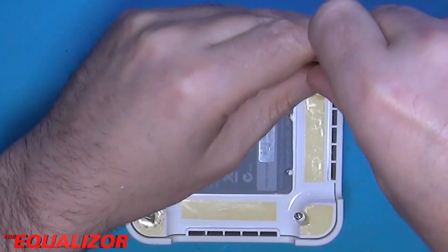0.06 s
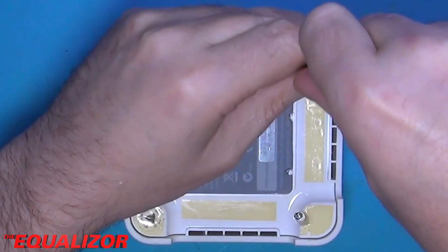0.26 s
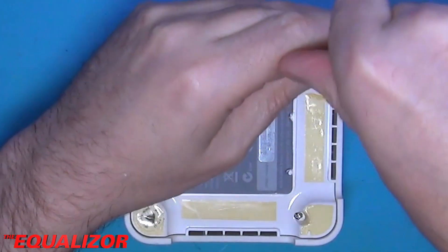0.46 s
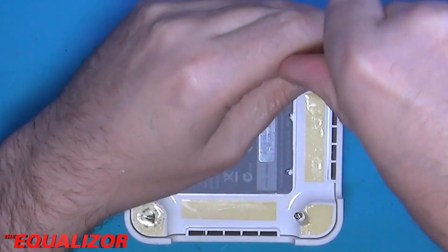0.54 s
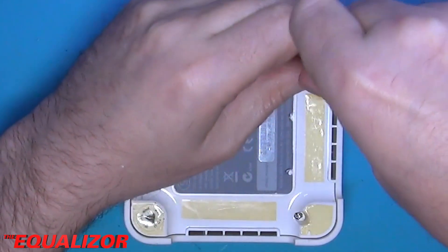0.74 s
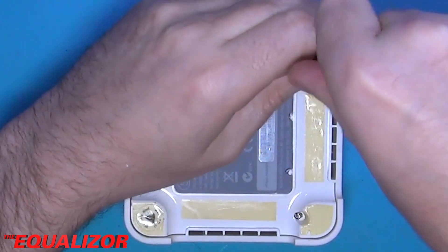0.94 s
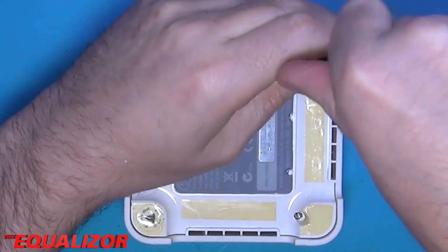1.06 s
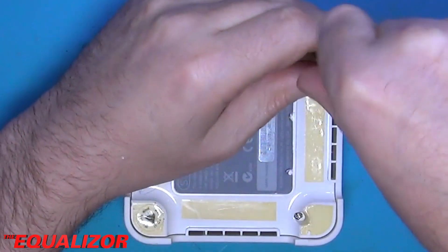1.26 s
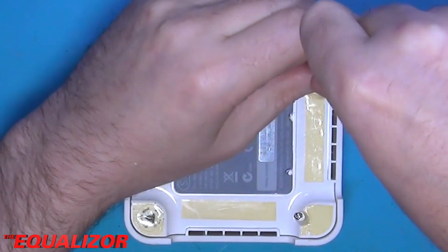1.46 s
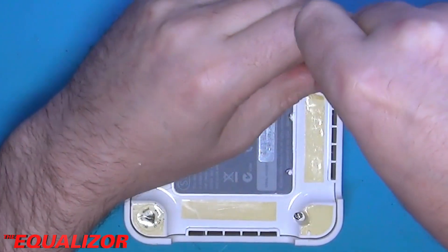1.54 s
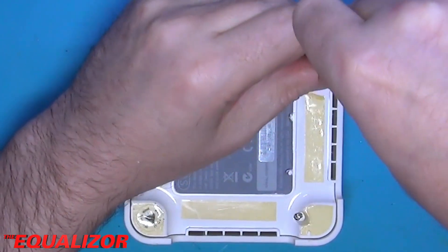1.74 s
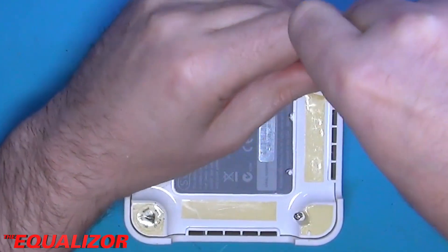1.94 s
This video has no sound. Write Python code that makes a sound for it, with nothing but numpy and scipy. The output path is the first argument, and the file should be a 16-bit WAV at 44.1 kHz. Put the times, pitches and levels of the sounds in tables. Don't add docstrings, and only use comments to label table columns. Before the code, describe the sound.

Close-up of a screwdriver bit slipping in a plastic shell, a hard crack early on, tiny handling knocks, another crisp cluster of clicks late, then soft gritty creeping, with a short indoor room tail.

```python
import sys
import numpy as np
from scipy import signal
from scipy.fft import rfft, irfft, next_fast_len
from scipy.io import wavfile

SR = 44100
rng = np.random.default_rng(int(sys.argv[2]) if len(sys.argv) > 2 else 0)


def magnitude_from_level(level_db):
    exponent = np.asarray(level_db, float) / 20
    return 10 ** exponent


def generate_wav(sig):
    pcm = np.round(np.clip(np.atleast_2d(sig).T, -1, 1) * 32767).astype(np.int16)
    wavfile.write(sys.argv[1], SR, pcm)


N = 88200

# (frequency [Hz], level per Hz [dB])
AIR_SPECTRUM = [(25, -31), (120, -9), (400, -6), (1100, -8), (2400, -13), (3300, -19), (4800, -14),
                (11000, -25), (12400, -50)]
AIR_DB = -67.5
HUM_HZ, HUM_DB = 200, -78

# (time [s], shell level [dB], hollow over shell [dB], steel over shell [dB], skid length [s])
SLIPS = [(.135, -45, -12, -12, .007), (.165, -47, -6, -14, .006), (.184, -50, -6, -12, .008),
         (.2122, -4.5, -7, -12, .0004), (.3291, -24, -4, -23, .0006), (.3845, -50, 2, -25, .008),
         (.906, -54, -12, -12, .006), (.4352, -39, 1, -25, .004), (.442, -46, 3, -25, .003),
         (1.432, -47, -6, -8, .01), (1.44, -32, -4, -14, .008), (1.451, -37, -8, -15, .009),
         (1.7044, -21, -6, -4, .002), (1.7088, -15, -6, 0, .0015), (1.7098, -20, 11, -5, .0015),
         (1.848, -54, -4, -16, .008), (1.8695, -51, -3, -3, .004), (1.877, -50, 8, -15, .01),
         (1.8855, -46, 13, -15, .003), (1.8995, -52, -8, 5, .02)]
# (frequency [Hz], level [dB], t60 [s])
SHELL = [(1050, -9, .02), (1260, -8, .028), (1600, 0, .034), (1865, -3, .025), (2075, -10, .025),
         (2380, -22, .02)]
# (frequency [Hz], level [dB], t60 [s])
HOLLOW = [(200, -24, .03), (370, -28, .04), (440, -19, .1), (525, -6, .035), (655, 0, .03), (870, -1, .025)]
# (frequency [Hz], level [dB], t60 [s])
STEEL = [(3120, -22, .014), (3850, -13, .012), (4100, -2, .012), (4650, 1, .012), (5000, -1, .014),
         (5400, -4, .012), (6000, 1, .012), (6500, -3, .012), (7300, -8, .01), (9400, -14, .008),
         (10500, -17, .008)]
# (frequency [Hz], level [dB])
CRACK = [(150, -35), (1500, -10), (3000, -14), (4200, -3), (6500, -1), (9000, -7), (11000, -14),
         (12000, -40)]
CRACK_DB, CRACK_T60_S = -6, .012
# (frequency [Hz], level [dB])
RADIATION = [(20, -22), (60, -8), (130, -4), (350, 1), (500, 5)]
CASING_DB = -3.5
FIRST_CATCH, SUDDEN_S = 6, .003

BLOW_SAMPLES = SR // 8
SCATTER_DB, DETUNE = 2, .006
LONGEST_S = .1
DULL_DB = .045
SOFT_DAMP, SOFT_ROOM = .12, .12

# (frequency [Hz], t60 [s])
ROOM_DECAY = [(100, .24), (450, .28), (1600, .2), (5000, .19), (11000, .13)]
# (frequency [Hz], level [dB])
ROOM_COLOUR = [(200, -5), (450, 3), (900, 4), (1600, -4), (3000, -3), (5500, 0), (8000, 1), (11000, 0)]
ROOM_DB, ROOM_DELAY_S = -10, .005
SPREAD_S = .0035
SNAP_DB = 6

# (time [s], peak level [dB])
NUDGES = [(.9135, -49), (.981, -53), (.991, -52), (1.372, -48), (1.379, -53), (.436, -43), (1.441, -40)]
# (frequency [Hz], level [dB], t60 [s])
HANDLE = [(530, -8, .025), (850, -6, .02), (1050, 0, .03), (1200, -6, .02), (1600, -4, .035)]

# (time [s], peak level [dB])
TICKS = [(1.1154, -53), (1.1244, -56), (1.1665, -54), (1.372, -56), (1.8442, -52), (1.8552, -50),
         (1.8644, -54), (1.8774, -52), (1.8886, -47), (1.9126, -46), (1.9294, -52), (1.9404, -56),
         (1.9455, -51), (1.9594, -51), (1.9749, -48), (1.9944, -55)]
TICK_DB, TICK_T60_S = 2, .04

# (time [s], pressure level [dB])
DRAG = [
    (1.83, -85),
    (1.85, -69),
    (1.9, -63),
    (1.925, -68),
    (2, -68),
]
# (frequency [Hz], level [dB])
GRIND = [(500, -22), (1600, -10), (2300, -5), (3300, -16), (4600, 0), (5800, -4), (8000, -14), (11000, -30)]

# (frequency [Hz], level [dB])
MIC = [(20, 0), (11800, 0), (12450, -40)]


def unit(x):
    return x / np.sqrt(np.mean(x ** 2) + 1e-20)


def peak(x):
    return x / np.abs(x).max()


def along(points, hz):
    f, v = np.transpose(points)
    return np.interp(np.log(hz + 1), np.log(f + 1), v)


def coloured(x, points):
    m = next_fast_len(len(x) + 8192)
    gain = magnitude_from_level(along(points, np.fft.rfftfreq(m, 1 / SR)))
    return irfft(rfft(x, m) * gain, m)[:len(x)]


def add(track, s, x):
    track[round(s * SR):][:len(x)] += x


def ring(modes, attack_s, db=0):
    t = np.arange(BLOW_SAMPLES) / SR
    hz, level_db, t60 = np.transpose(modes)[..., None]
    level_luck, pitch_luck = rng.standard_normal((2, len(modes), 1))
    level_db = level_db + SCATTER_DB * level_luck + DULL_DB * db * hz / 1000
    decay = magnitude_from_level(level_db - 60 * t / np.clip(t60, .005, LONGEST_S))
    tones = decay * np.sin(2 * np.pi * hz * (1 + DETUNE * pitch_luck) * t)
    return peak(tones.sum(0) * (1 - np.exp(-t / attack_s)))


def air():
    hum = magnitude_from_level(HUM_DB) * np.sin(2 * np.pi * HUM_HZ * np.arange(N) / SR)
    return magnitude_from_level(AIR_DB) * unit(coloured(rng.standard_normal(N), AIR_SPECTRUM)) + hum


def skid(skid_s):
    t = np.arange(BLOW_SAMPLES) / SR
    catches = rng.standard_normal(len(t)) ** 3 * np.sin(np.pi * np.minimum(t / skid_s, 1))
    catches[0] = FIRST_CATCH * min(1, SUDDEN_S / skid_s) ** 2
    return catches


def steel_crack(db):
    t = np.arange(BLOW_SAMPLES) / SR
    colour = [(hz, g + DULL_DB * db * hz / 1000) for hz, g in CRACK]
    noise = unit(coloured(rng.standard_normal(len(t)), colour))
    return magnitude_from_level(CRACK_DB - 60 * t / CRACK_T60_S) * noise


def slips():
    near, spread = np.zeros((2, N + SR))
    t = np.arange(BLOW_SAMPLES) / SR
    first_moments = magnitude_from_level(-20 * t / SPREAD_S)
    impulse = 1. * (np.arange(len(t)) == 64)
    snap = magnitude_from_level(SNAP_DB) * peak(coloured(impulse, CRACK))
    for s, db, hollow_db, steel_db, skid_s in SLIPS:
        catches = skid(skid_s)
        crack = steel_crack(db)
        damped_hollow = [(hz, g, t60 * magnitude_from_level(SOFT_DAMP * db)) for hz, g, t60 in HOLLOW]
        shell = ring(SHELL, attack_s=.0005)
        hollow = ring(damped_hollow, attack_s=.0015)
        steel = ring(STEEL, attack_s=.0002, db=db) + crack

        def skidded(x):
            return peak(signal.fftconvolve(x, catches)[:len(t)])

        casing = skidded(shell) + magnitude_from_level(hollow_db) * skidded(hollow)
        blow = magnitude_from_level(CASING_DB) * casing + magnitude_from_level(steel_db) * skidded(steel)
        add(near, s, magnitude_from_level(db) * blow)

        casing = skidded(shell * first_moments) + magnitude_from_level(hollow_db) * skidded(hollow * first_moments)
        blow = magnitude_from_level(CASING_DB) * casing + magnitude_from_level(steel_db) * snap
        add(spread, s, magnitude_from_level(db * (1 + SOFT_ROOM)) * blow)
    return coloured(near[:N], RADIATION), coloured(spread[:N], RADIATION)


def room(x):
    out = np.zeros(N)
    first_half = np.arange(N) < N // 2
    for part in (first_half, ~first_half):
        hz, t, z = signal.stft(rng.standard_normal(SR // 2), SR, nperseg=256)
        decay = magnitude_from_level(-60 * t / along(ROOM_DECAY, hz)[:, None])
        tail = signal.istft(z * decay, SR, nperseg=256)[1]
        delayed = np.pad(x * part, (round(ROOM_DELAY_S * SR), 0))
        out += signal.fftconvolve(delayed, tail / np.linalg.norm(tail))[:N]
    return out


def nudges():
    out = np.zeros(N + SR)
    for s, db in NUDGES:
        add(out, s, magnitude_from_level(db) * ring(HANDLE, attack_s=.003))
    return out[:N]


def ticks():
    out = np.zeros(N + SR)
    t = np.arange(BLOW_SAMPLES) / SR
    for s, db in TICKS:
        fade = magnitude_from_level(db + TICK_DB - 60 * t / TICK_T60_S)
        add(out, s, fade * ring(STEEL[1:], attack_s=.001, db=db / 2))
    return out[:N]


def drag():
    s, db = np.transpose(DRAG)
    grit = unit(coloured(rng.standard_normal(N) ** 3, GRIND))
    return magnitude_from_level(np.interp(np.arange(N) / SR, s, db, left=-120)) * grit


def scene():
    near, spread = slips()
    handling = ticks() + nudges() + drag()
    answer = magnitude_from_level(ROOM_DB) * coloured(room(spread + handling), ROOM_COLOUR)
    return (near + handling + answer + air())[None]


def roll_off(x):
    return signal.sosfilt(signal.butter(12, 12430, fs=SR, output="sos"), x)


def record(dry):
    mix = coloured(dry[0], MIC)[None]
    return roll_off(mix)


dry = scene()
out = record(dry)
generate_wav(out)
```